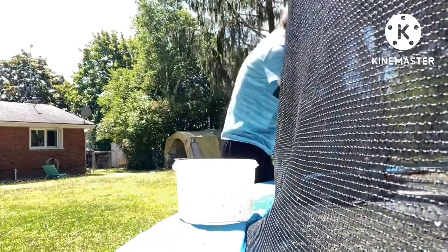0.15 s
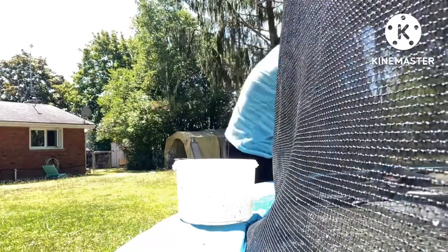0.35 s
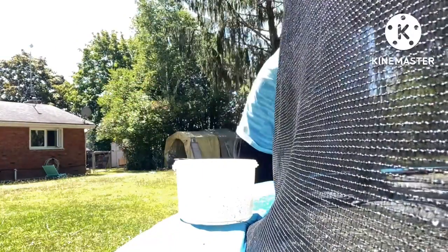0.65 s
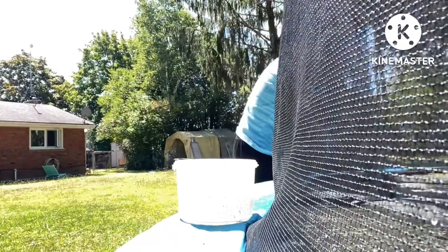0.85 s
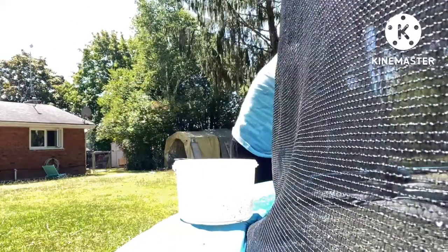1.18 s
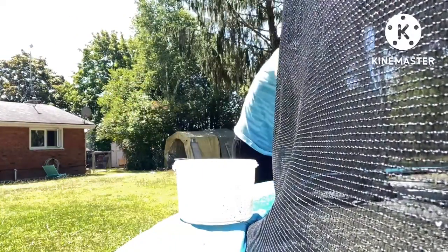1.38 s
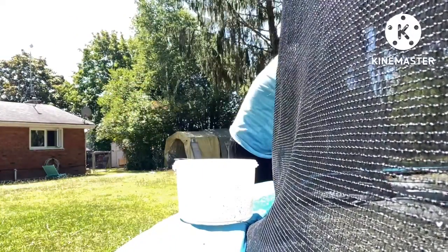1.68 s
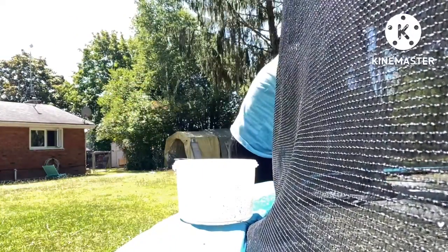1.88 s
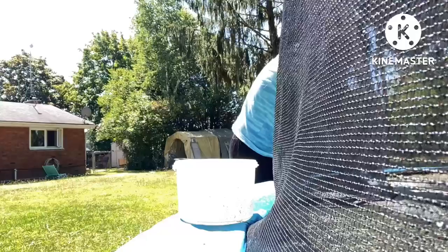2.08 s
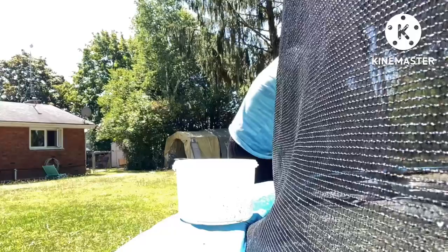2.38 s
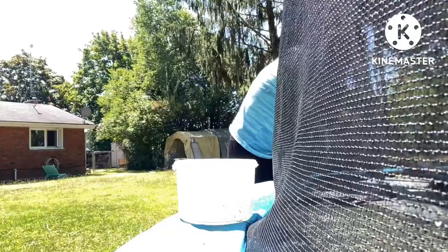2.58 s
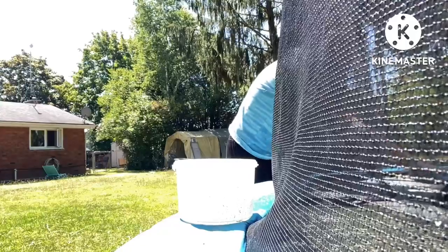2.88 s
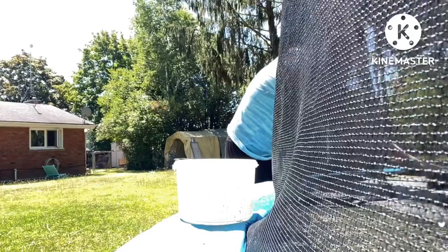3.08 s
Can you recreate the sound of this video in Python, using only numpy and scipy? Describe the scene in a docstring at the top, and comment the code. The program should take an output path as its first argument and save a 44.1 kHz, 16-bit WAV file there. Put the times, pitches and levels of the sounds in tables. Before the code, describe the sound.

A stiff wet brush scrubs a woven trampoline mat in quick, crackling, raspy strokes outdoors.

```python
"""A stiff wet brush scrubs a trampoline mat in a garden, about three strokes a second.
It crackles, rasps and hisses, with a few sharp ticks; low swells, rumble and traffic lie behind.
The brush is made of thousands of random clicks, split into pitch bands that follow its speed.
Snaps are very short bright noise bursts, low swells are short deep waves, and the background is
coloured noise."""
import sys
import numpy as np
from scipy import signal
from scipy.fft import rfft, irfft
from scipy.io import wavfile

SR = 44100
rng = np.random.default_rng(int(sys.argv[2]) if len(sys.argv) > 2 else 0)


def to_wav(sig):
    """Store sig (one row per channel, or 1-D mono) as 16-bit WAV at the path in sys.argv[1].

    Samples outside -1..1 are clipped; the rate is SR.
    """
    pcm = np.clip(np.atleast_2d(sig), -1, 1) * 32767
    pcm = np.round(pcm).astype(np.int16)
    wavfile.write(sys.argv[1], SR, pcm.T)  # frames by channels


N = 143325
TIME = np.arange(N) / SR   # s
FREQS = np.maximum(np.arange(N // 2 + 1) * SR / N, 1)   # Hz, kept above 0 for the logarithm

# phase of left against right for brush sounds at two spots, giving it stereo width:
# f/Hz, phase at the first spot/rad, phase at the second spot/rad
BRUSH_PHASE = [(100, .1, .1), (500, 1.3, 1.7), (1000, 3.6, 3.2), (1400, 4.1, 3.9), (2400, 3.2, 2.3),
               (3000, 2.3, .4), (3400, .7, 0), (4400, .3, -1.7), (5400, -2.1, -3.4), (6500, -2, -1.2),
               (7200, -.4, -.5), (8300, 0, 0), (9400, 1.3, 1.3), (10000, 3, 3), (11000, 3.3, 3.3),
               (12400, 6.1, 6.2), (13700, 6.4, 6.4), (14800, 9.3, 9.3), (15700, 9.5, 9.5)]
# loudness balance of the brush: f/Hz, left minus right/dB
BRUSH_BALANCE = [(500, -7.5), (1400, -7.5), (2200, 5.5), (2900, -1.5), (4300, -2.5), (6500, -1.5),
                 (7800, -0.5), (15000, -0.5)]


def from_db(db):
    """Turn decibels into a factor for the wave's size."""
    return 10 ** (np.asarray(db) / 20)


def rms_one(x):
    """Scale a sound to an average strength (rms) of 1."""
    return x / np.sqrt(np.mean(x ** 2) + 1e-20)


def over_hz(points, axis=1):
    """Read one table column at every frequency, in straight lines over log frequency."""
    points = np.array(points)
    return np.interp(np.log(FREQS), np.log(points[:, 0]), points[:, axis])


def over_time(points):
    """Read a table of times and values at every sample."""
    return np.interp(TIME, *np.transpose(points))


def drift(hz):
    """Random wandering with spread 1: noise that weakens above the given frequency."""
    noise = rfft(rng.standard_normal(N))
    return rms_one(irfft(noise / (1 + (FREQS / hz) ** 2), N))


def placed(balance_db, phase):
    """Spread a sound over left and right by loudness balance and phase difference."""
    left = from_db(balance_db / 2) * np.exp(1j * phase)
    right = from_db(-balance_db / 2) * np.ones(len(FREQS))
    return np.array([left, right])


def bristle_clicks():
    """Spectrum of bristles flicking over the weave at random: most flicks small, a few large."""
    bristles_per_s, size_spread_db = 22000, 2
    sizes = from_db(size_spread_db * np.minimum(rng.exponential(1, N), 5))
    pushes = sizes * rng.choice([-1, 1], N)   # up or down
    happens = rng.random(N) < bristles_per_s / SR
    return rfft(rms_one(pushes * happens))


def stroke_levels():
    """Levels of rasp, scrape, hiss and fizz: a faster brush is louder, a resting one only creeps."""
    # brush strokes, before the overall brush gain: start/s, speeding up/s, full speed/s, slowing/s,
    # level/dB, then relative to it: rasp of the mat/dB, scrape of bent bristles/dB, wet fizz/dB
    strokes = [(0.0, .26, 0.018, 0.18, -30.5, -8, -2, 0), (.46, 0.16, 0.013, .15, -33.5, -6.5, -2.5, -2.5),
               (.77, 0.12, 0.033, .21, -26, -3, -3, -3.5), (1.165, 0.079, .055, .15, -32.5, -4.5, 0, -2),
               (1.469, 0.083, 0.11, .13, -29.5, -2.5, -2, -2), (1.80, 0.11, 0.048, 0.1, -37, 1, 1.5, -0.5),
               (2.08, 0.094, 0.019, 0.2, -31.5, 3.5, 0, -1), (2.391, 0.13, .14, 0.08, -32, -11, -1, 0),
               (2.85, .05, 0.013, 0.37, -34.5, -14, 0, 0), (3.148, 0.11, .05, .1, -37.5, -21, -4.5, -1)]
    # bristle tips catch and spring free: middle/s, length/s, level/dB,
    # then relative to it: rasp of the mat/dB, scrape of bent bristles/dB, wet fizz/dB
    catches = [(0.112, 0.2, -37.5, 4.5, -10, 0), (0.216, 0.16, -32.5, 1, -1, -9),
               (0.487, 0.11, -48.5, -4, 2, 6), (0.569, 0.082, -35.5, -8, 0.5, -3),
               (0.841, 0.1, -34.5, 1, -3.5, -7), (1.148, .08, -51, -2, 5, -2),
               (1.216, 0.11, -44.5, 8, 12.5, -9), (1.39, 0.1, -47, 2, 1, 5), (1.538, 0.1, -41, 13.5, 4, -9),
               (1.7, 0.098, -45, 10, -4, 1), (1.824, 0.062, -49, 11, 8.5, -15), (1.964, .05, -38, -3, 0, 1),
               (2.637, 0.16, -31, -14, -6, 1), (2.717, 0.11, -31.5, -23, -7, 5.5),
               (2.927, 0.11, -37, -7, 9.5, -4)]
    # bristles still creeping at the turns, before the brush gain; rows are rasp, scrape, hiss, fizz: level/dB
    resting = [
        [-67],
        [-47.5],
        [-48],
        [-53.5],
    ]
    # the brush is lifted: its resting level dips briefly
    lift_s, lift_width_s, lift_db = 2.8, 0.031, -4.5
    speed_power = 2.4   # how steeply level grows with speed

    lifted = np.exp(-((TIME - lift_s) / lift_width_s) ** 2)
    power = from_db(np.array(resting) + lift_db * lifted) ** 2
    moves = list(strokes)
    for middle, length, *levels in catches:
        moves.append((middle - length / 2, length / 2, 0, length / 2, *levels))
    for start, rise, hold, fall, db, rasp_db, scrape_db, fizz_db in moves:
        end = start + rise + hold + fall
        ramp = np.minimum((TIME - start) / rise, (end - TIME) / fall)
        speed = np.sin(np.pi / 2 * np.clip(ramp, 0, 1))
        gains = from_db([[db + rasp_db], [db + scrape_db], [db], [db + fizz_db]])
        power += (gains * speed ** speed_power) ** 2
    return np.sqrt(power)


def brush(gain_db=5):
    """Flicks arrive directly and scattered; pitch bands waver apart while the whole brush judders."""
    # colour of the scrubbing: f/Hz, level/dB
    scrub_colour = [(120, -6), (300, 0), (600, 2.2), (900, 2.6), (1400, 4.8), (1800, 4), (2300, 1.9),
                    (2800, 1.9), (3200, 1.8), (3800, .5), (4700, -.7), (6000, -.6), (6700, -1.8),
                    (7400, .8), (8300, .3), (9400, -.4), (10500, -2.6), (12300, -2.8), (13700, -4.4),
                    (15500, -5)]
    # strength of the scattered sound: f/Hz, scattered against direct/dB
    scatter_share = [(300, 0), (550, 4), (1100, 3), (2200, -5), (3100, -1), (3800, -4), (4800, 0),
                     (6500, -1), (7600, -9), (9000, -6), (10500, -13), (11800, -7), (15000, -13)]
    move_s, move_length_s = 2.37, 0.39   # the brush moves on to the second spot
    rasp_below_hz, hiss_above_hz, fizz_above_hz = 1900, 5200, 10500
    tuft_db, tuft_hz = 1.2, 6   # tufts of different pitch come more or less into play
    judder_db, judder_hz = 0.63, 88   # irregular stick and slip of the whole brush

    scatter = from_db(over_hz(scatter_share))
    direct = bristle_clicks()
    scattered = np.array([bristle_clicks(), bristle_clicks()])   # different at each ear
    flicks = (direct + scatter * scattered) / np.sqrt(1 + scatter ** 2)
    flicks = flicks * from_db(over_hz(scrub_colour))
    balance = over_hz(BRUSH_BALANCE)
    first = irfft(flicks * placed(balance, over_hz(BRUSH_PHASE, axis=1)), N)
    second = irfft(flicks * placed(balance, over_hz(BRUSH_PHASE, axis=2)), N)
    moved = np.clip((TIME - move_s) / move_length_s, 0, 1)
    flicks = rfft(first * (1 - moved) + second * moved)

    rasp_level, scrape_level, hiss_level, fizz_level = stroke_levels()
    centres = np.linspace(400 ** .5, 15500 ** .5, 28) ** 2   # Hz, closer together at the bottom
    out = 0
    for hz, only in zip(centres, np.eye(len(centres))):
        # share of each kind of sound in this band; the four add up to 1
        rasp = 1 / (1 + (hz / rasp_below_hz) ** 6)
        fizz = 1 / (1 + (fizz_above_hz / hz) ** 10)
        scrape = 1 / (1 + (hz / hiss_above_hz) ** 6) - rasp
        hiss = 1 - rasp - scrape - fizz
        level = rasp * rasp_level + scrape * scrape_level + hiss * hiss_level + fizz * fizz_level
        band = irfft(flicks * np.interp(FREQS, centres, only), N)
        out = out + band * level * from_db(tuft_db * drift(tuft_hz))
    return out * from_db(gain_db + judder_db * drift(judder_hz))


def bristle_snaps():
    """Single stiff bristles spring loose: bursts of random-sign noise that die away at once."""
    # snaps: t/s, level at the start before the bass is cut/dB
    snaps = [(2.0632, -33), (2.0775, -30), (2.648, -15), (2.6753, -11), (2.6879, -10.5), (2.7024, -11),
             (2.7111, -14), (2.7135, -11.5), (2.7198, -12), (2.7242, -14), (2.7258, -11), (2.7333, -15),
             (2.7454, -19), (3.1081, -23), (3.1122, -23), (3.1545, -28), (3.1603, -27), (3.2419, -26)]
    decay_s, above_hz = 0.0003, 4300
    hits = 0
    for start, db in snaps:
        hits = hits + from_db(db) * (TIME >= start) * np.exp(-np.abs(TIME - start) / decay_s)
    bright = signal.butter(2, above_hz, "high", fs=SR, output="sos")
    ticks = signal.sosfilt(bright, hits * rng.choice([-1, 1], N))
    return irfft(rfft(ticks) * placed(over_hz(BRUSH_BALANCE), over_hz(BRUSH_PHASE, axis=2)), N)


def low_swells():
    """Short low waves swell and fade within the rumble."""
    # low swells: middle/s, height of the swell/dB, pitch/Hz
    swells = [(0.169, -24, 51), (.278, -30, 140), (0.464, -26, 55), (1.138, -26, 110), (1.245, -23.5, 71),
              (1.354, -26.5, 120), (2.333, -17.5, 87), (2.455, -23.5, 67.5), (2.742, -30, 116),
              (2.92, -26, 62)]
    width_s = 0.0053   # spread of the bell-shaped swell
    out = 0
    for middle, db, hz in swells:
        swell = from_db(db) * np.exp(-.5 * ((TIME - middle) / width_s) ** 2)
        out = out + swell * np.sin(2 * np.pi * hz * (middle - TIME))
    return out


def outdoors(colour, level_db, waver_db, waver_hz):
    """Coloured background noise, partly shared between the ears, whose level wavers."""
    # width of the background: f/Hz, left-right likeness (0 to 1), phase of left against right/rad
    air_stereo = [(50, .8, 0), (150, .84, .3), (350, .6, 1.1), (800, .7, 2.3), (1300, .4, 3.1),
                  (2500, .15, 3.5), (15000, .1, 3.5)]
    balance_db = -1.4   # left minus right
    alike = np.clip(over_hz(air_stereo), 0, 1)
    white = rfft(rng.standard_normal((3, N)))   # one shared noise and one for each ear
    air = np.sqrt(alike) * white[0] + np.sqrt(1 - alike) * white[1:]
    air = air * placed(balance_db, over_hz(air_stereo, axis=2))
    noise = rms_one(irfft(air * from_db(over_hz(colour)), N))
    return noise * from_db(over_time(level_db) + waver_db * drift(waver_hz))


def far_tyres():
    """Tyre hum of one far car: a narrow band of noise swells and fades."""
    # colour of the hum: f/Hz, level/dB
    tyre_colour = [(300, -45), (620, -14), (740, -1), (860, 0), (1050, -10), (1500, -32), (4000, -60)]
    peak_s, rise_s, fall_s, peak_db = 2.77, .12, .22, -32.5
    hum = outdoors(tyre_colour, [(0, peak_db)], waver_db=1, waver_hz=5.3)
    return hum * np.exp(-np.abs(TIME - peak_s) / np.where(TIME < peak_s, rise_s, fall_s))


def distant_traffic():
    """Far traffic: a wash of mostly middle-pitched noise that swells and fades."""
    # colour of the wash: f/Hz, level/dB
    traffic_colour = [(100, 13), (250, -6), (360, 5), (460, 0.5), (620, 5), (800, 11), (1000, 6.5),
                      (1400, 0.5), (2000, -6), (3000, -15), (5000, -31), (15000, -68)]
    # its loudness: t/s, level/dB
    traffic_level = [(0, -29), (.12, -29.5), (.45, -31), (.8, -30.5), (1.1, -31), (1.35, -31), (1.5, -33.5),
                     (2.0, -34), (2.4, -34.5), (2.8, -34), (3.25, -33)]
    return outdoors(traffic_colour, traffic_level, waver_db=1.2, waver_hz=12)


def low_rumble():
    """Outdoor rumble: deep noise that slowly changes in level."""
    # colour of the rumble: f/Hz, level/dB
    rumble_colour = [(12, -32), (25, -18), (42, -10), (62, 3.5), (85, -3.5), (125, -4.5), (170, -4.5),
                     (240, -13), (400, -21.5), (550, -22), (900, -72)]
    # its loudness: t/s, level/dB
    rumble_level = [(0, -32.5), (.35, -31.5), (.7, -32), (1.1, -33), (1.45, -36.5), (1.7, -33.5),
                    (2.15, -34), (2.5, -36), (3.25, -36.5)]
    return outdoors(rumble_colour, rumble_level, waver_db=0.97, waver_hz=3.3)


def scene():
    """Brush and mat in front of the garden's background."""
    scrubbing = brush() + bristle_snaps()
    return scrubbing + low_swells() + far_tyres() + distant_traffic() + low_rumble()


def record(dry):
    """The microphone loses the deepest bass; the top is cut steeply."""
    bass_cut = signal.butter(3, 36, "high", fs=SR, output="sos")   # Hz
    top_cut = signal.ellip(12, .1, 90, 15700, fs=SR, output="sos")   # ripple dB, depth dB, Hz
    return signal.sosfilt(top_cut, signal.sosfilt(bass_cut, dry))


dry = scene()
out = record(dry)
to_wav(out)
```